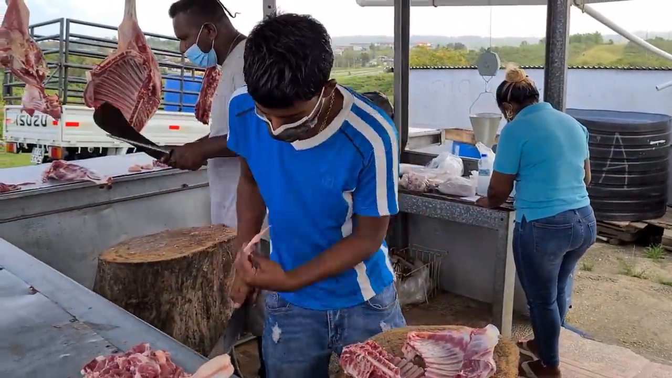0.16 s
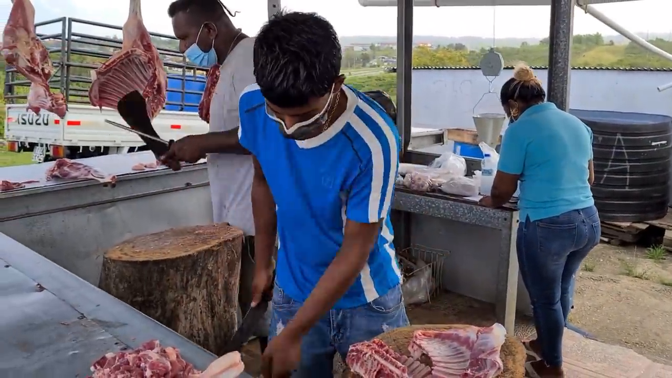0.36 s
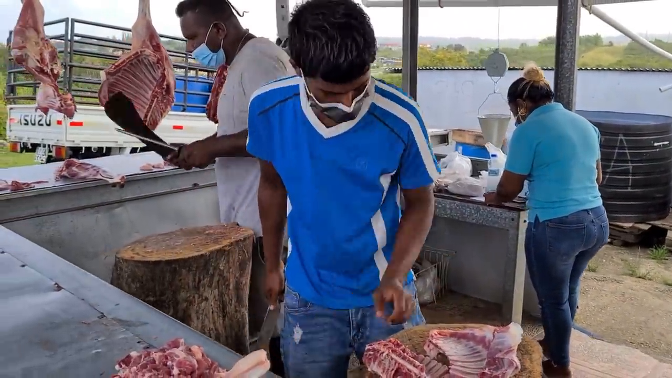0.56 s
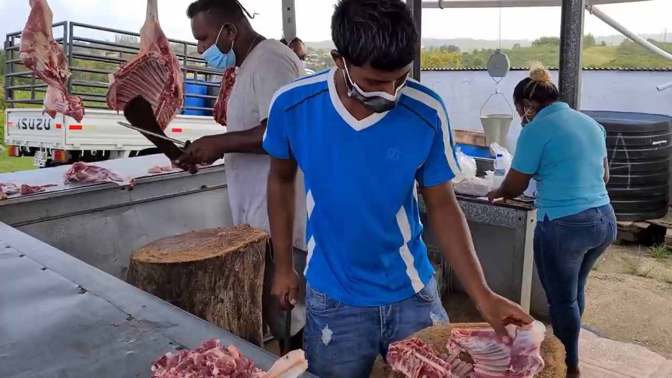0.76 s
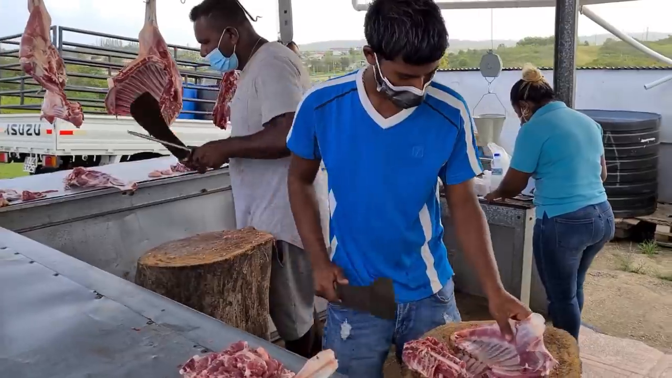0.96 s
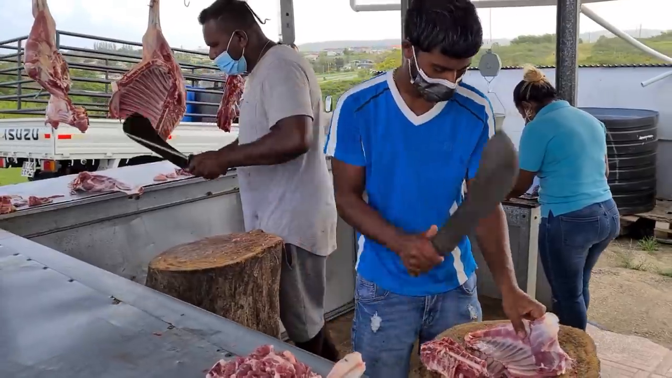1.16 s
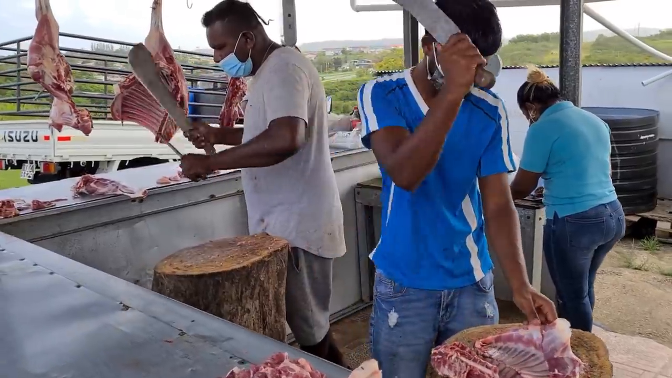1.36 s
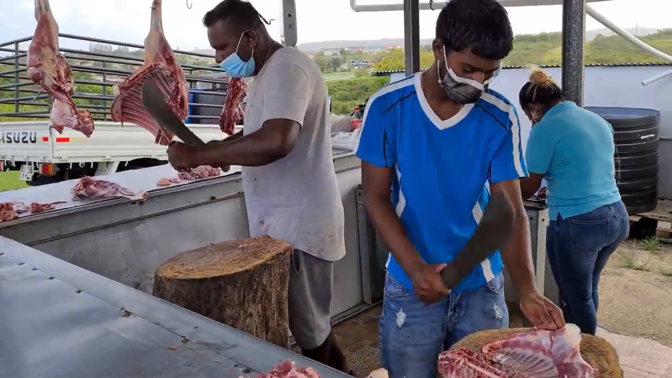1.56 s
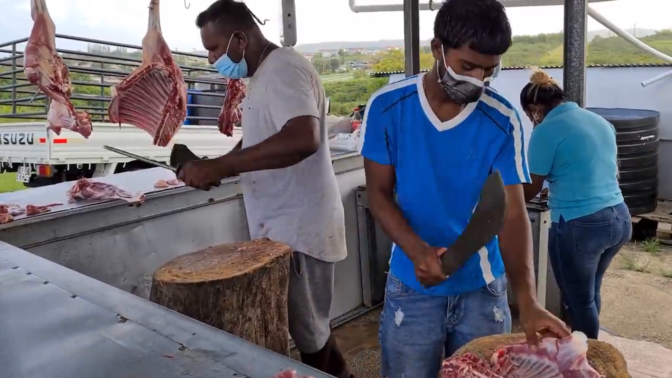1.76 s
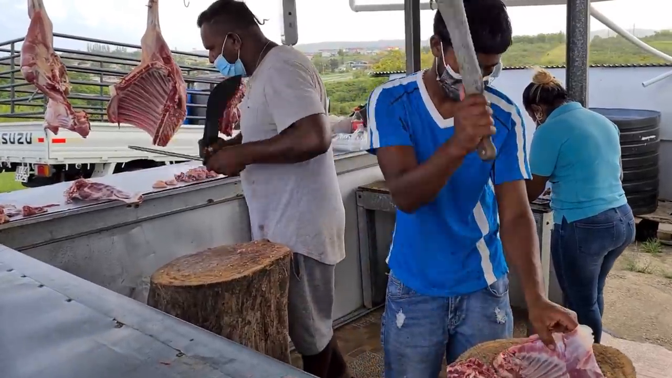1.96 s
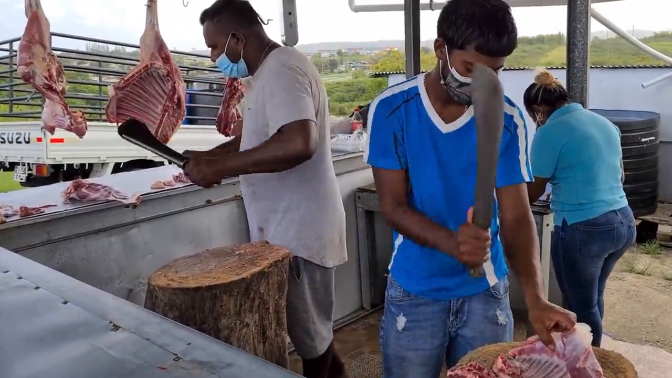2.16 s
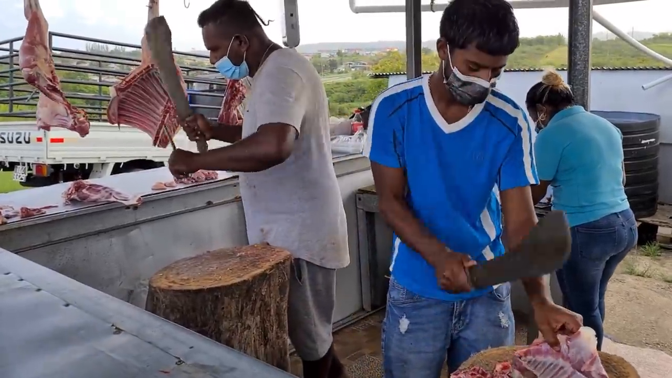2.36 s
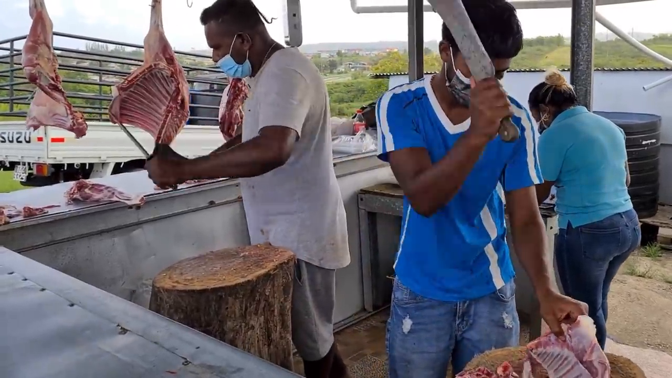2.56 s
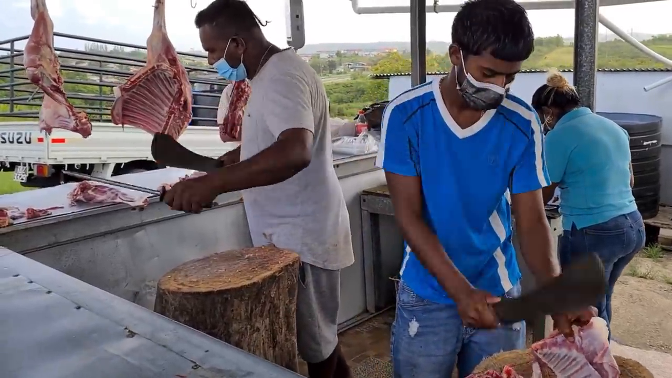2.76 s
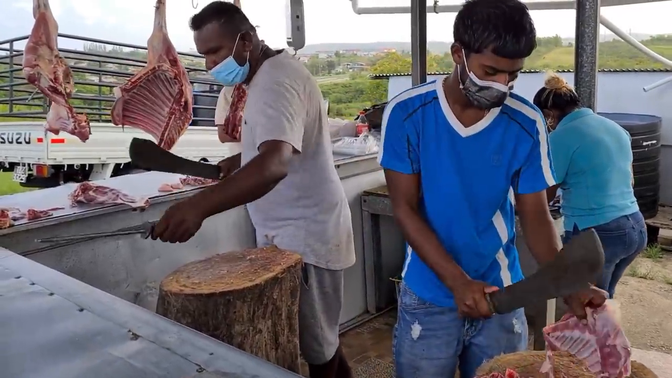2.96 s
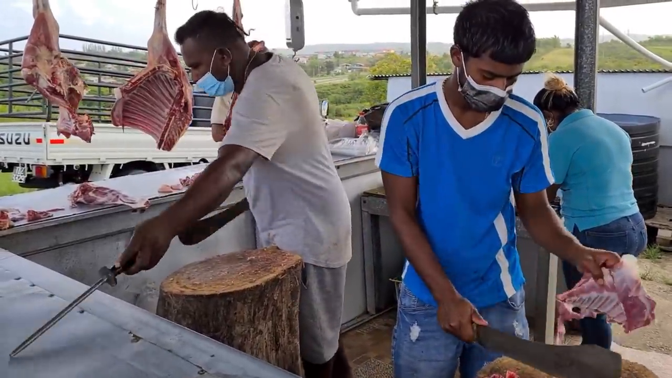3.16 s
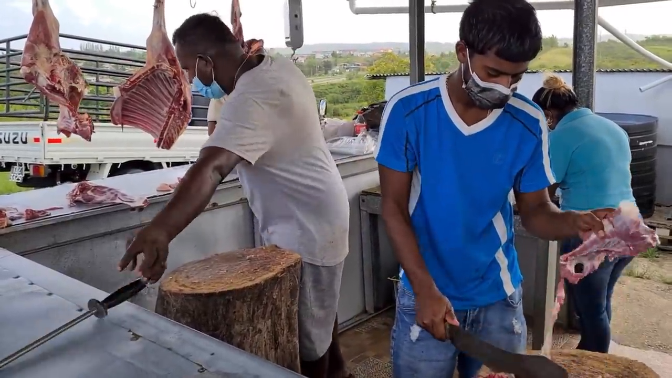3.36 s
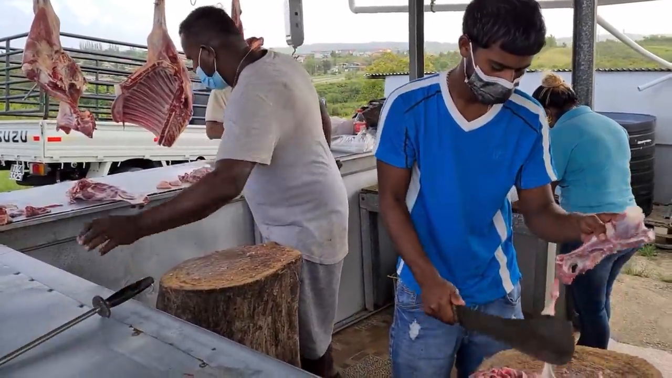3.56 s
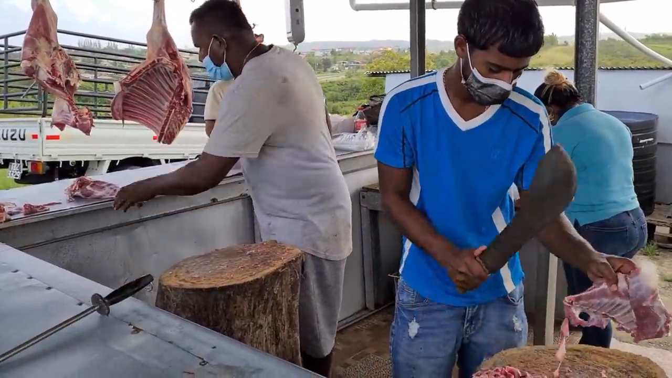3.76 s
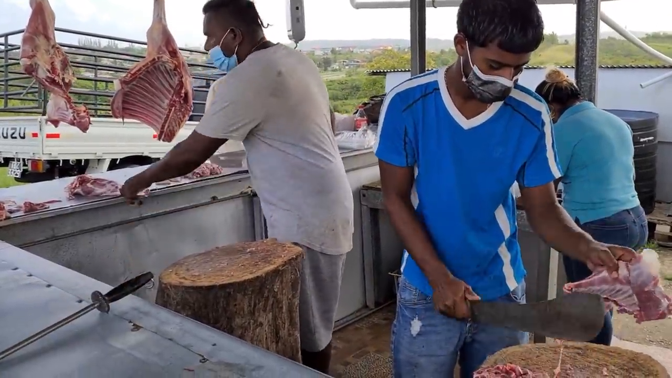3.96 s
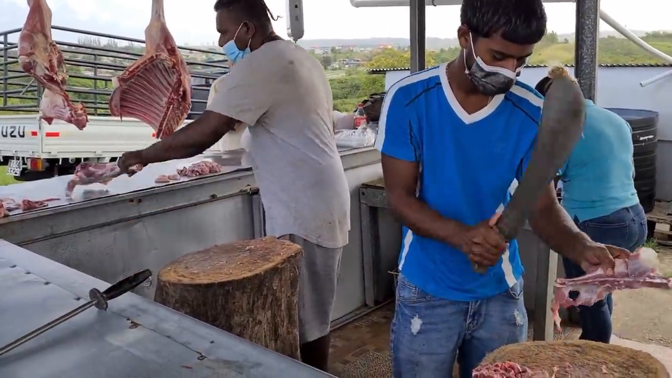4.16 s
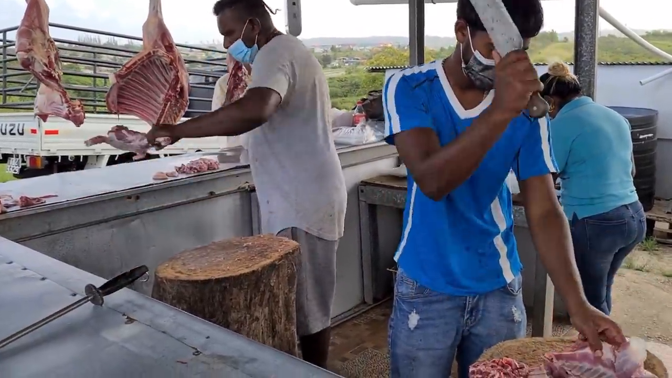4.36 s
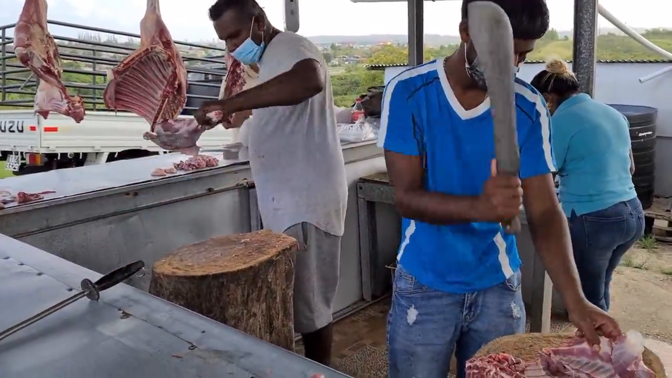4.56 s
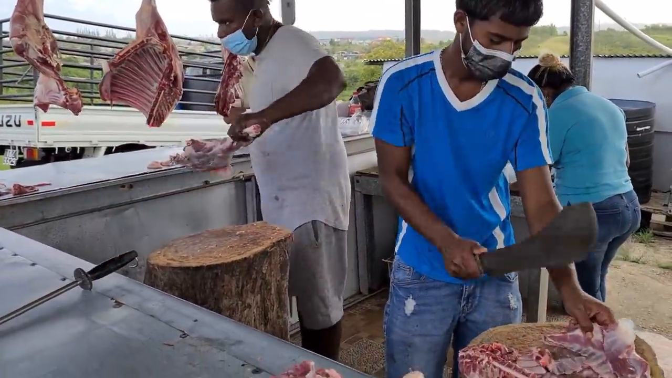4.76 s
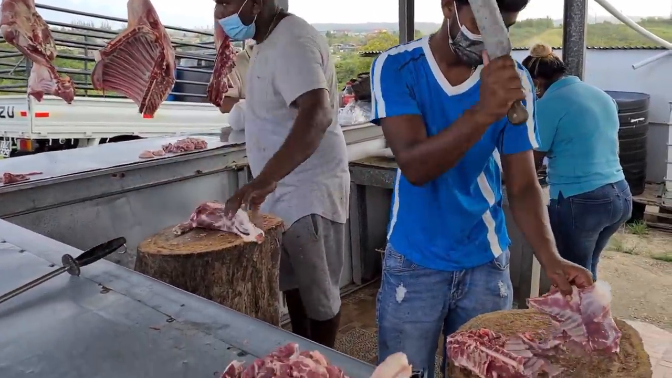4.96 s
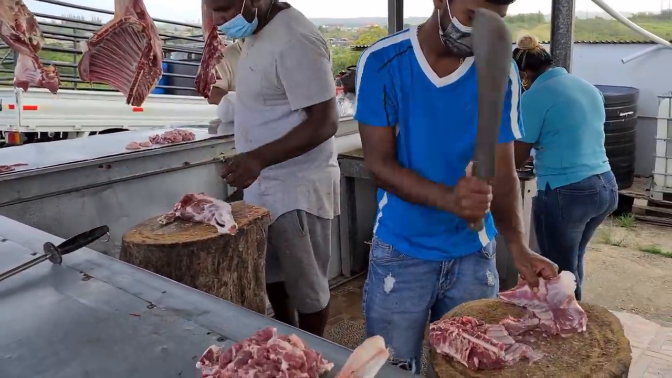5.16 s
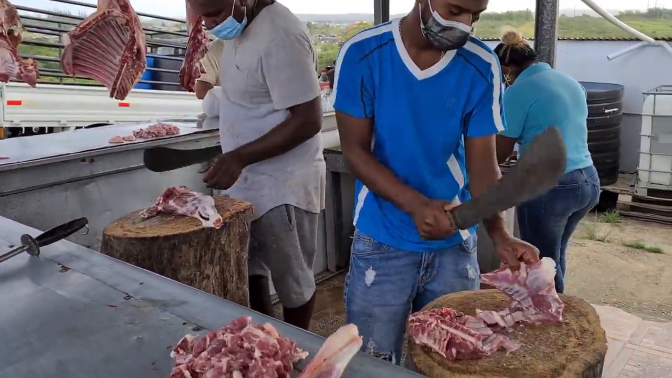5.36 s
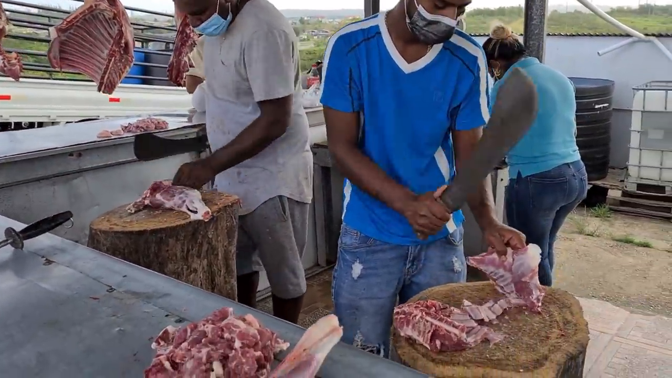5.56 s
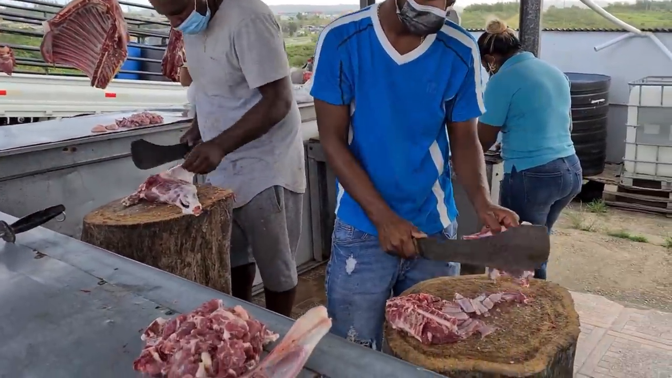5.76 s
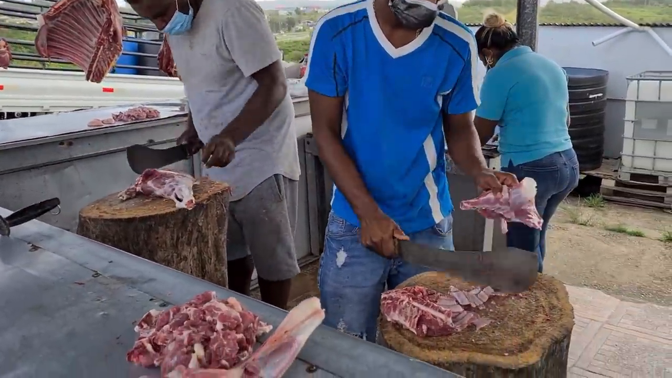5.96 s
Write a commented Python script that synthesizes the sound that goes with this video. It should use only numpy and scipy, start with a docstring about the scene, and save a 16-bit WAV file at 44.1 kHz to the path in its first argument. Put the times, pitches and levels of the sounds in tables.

```python
"""An open-air meat stall under a low roof, with a fading engine hum and the noise of the road behind it.
From the start a butcher whets a blade on a honing steel: friction bands, wavering modes and clinks.
Soon a second one chops meat and bone on a stump: filtered noise bursts and short decaying modes.
Then the steel drops on a sheet-metal counter: booming modes, a dense noise tail and a rattle.
Near the end, amid the last chops, meat is slapped on another block: a blow plus one sharp resonance."""
import sys
import numpy as np
from scipy import signal
from scipy.fft import rfft, irfft, next_fast_len
from scipy.io import wavfile
from scipy.ndimage import uniform_filter1d, map_coordinates

SR = 44100
rng = np.random.default_rng(int(sys.argv[2]) if len(sys.argv) > 2 else 0)


def generate_wav(signal):
    """Clip the signal to [-1, 1] and save it as 16-bit WAV at the path in sys.argv[1]."""
    frames = np.transpose(np.atleast_2d(signal))
    scaled = np.clip(frames, -1, 1) * 32767
    pcm = np.round(scaled).astype(np.int16)
    wavfile.write(sys.argv[1], SR, pcm)


N = 265482
TIME = np.arange(N) / SR  # the whole scene, seconds
SHORT = np.arange(SR // 2) / SR  # one event, seconds


def amp(db):
    """Level law: decibels to amplitude gain."""
    return 10 ** (np.asarray(db) / 20)


def unit(x):
    """Normalization: scale to rms 1."""
    return x / np.sqrt(np.mean(x ** 2) + 1e-20)


def fade(t, t60):
    """Exponential decay: the amplitude falls to a thousandth after t60."""
    return np.exp(-np.log(1000) * t / np.maximum(t60, 1e-4))


def along(points, hz):
    """Logarithmic frequency scale: (Hz, value) points interpolated at hz."""
    f, v = np.transpose(points)
    return np.interp(np.log(hz + 1), np.log(f + 1), v)


def over_time(points):
    """Linear envelope: (seconds, value) points interpolated at every sample."""
    s, v = np.transpose(points)
    return np.interp(TIME, s, v)


def wobble(rate, t):
    """Band-limited fluctuation: a smooth random curve with rate knots a second."""
    return map_coordinates(rng.standard_normal(1024), [t * rate], order=2, mode="wrap")


def filtered(x, response):
    """Linear filtering: the spectrum of x is multiplied by a response of frequency."""
    n = x.shape[-1]
    m = next_fast_len(n + 8192)
    return irfft(rfft(x, m) * response(np.fft.rfftfreq(m, 1 / SR)), m)[..., :n]


def add(track, s, sound):
    """Superposition: mix a stereo sound into the track at s seconds."""
    start = max(round(s * SR), 0)
    track[:, start:start + sound.shape[-1]] += sound[:, :N - start]


# Left-right correlation of diffuse sound. Each row: frequency in Hz, correlation from -1 to 1.
LIKENESS = [(30, 0.55), (70, 0.54), (140, 0.95), (290, 0.82), (640, 0.57), (1400, -0.26), (3000, 0.0058),
            (7000, 0.079)]


def diffuse(spectrum, size):
    """Diffuse field: stereo noise of rms 1, largely alike in the bass, nearly unrelated in the treble."""
    def mid_side(hz):
        turn = np.arccos(np.clip(along(LIKENESS, hz), -1, 1)) / 2
        return amp(along(spectrum, hz)) * [np.cos(turn), np.sin(turn)]

    mid, side = filtered(rng.standard_normal((2, size)), mid_side)
    return unit(np.array([mid + side, mid - side]))


def dying(spectrum, t60s):
    """Frequency-dependent damping: diffuse noise in which each frequency dies at its own speed."""
    hz, t, z = signal.stft(diffuse(spectrum, len(SHORT)), SR, nperseg=256)
    decayed = z * fade(t, along(t60s, hz)[:, None])
    return signal.istft(decayed, SR, nperseg=256)[1][:, :len(SHORT)]


# Decay of the stall's echo. Each row: frequency in Hz, t60 in seconds.
ROOF_T60 = [(120, 0.34), (500, 0.29), (1500, 0.23), (4000, 0.23), (9000, 0.22), (15000, 0.18)]


def roof_tail(spectrum, swell_s):
    """Reverberation: counters and roof answer with a dense tail that swells and dies; energy 1 a channel."""
    tail = dying(spectrum, ROOF_T60) * (1 - np.exp(-np.square(SHORT / swell_s)))
    return unit(tail) / np.sqrt(len(SHORT))


def direct(x, lag_ms):
    """Arrival-time difference: a positive lag reaches the right channel first, a negative one the left."""
    sides = np.array([[-1], [1]])
    return filtered(x, lambda hz: np.exp(1j * np.pi * hz * lag_ms / 1000 * sides))


def in_stall(x, room_db, lag_ms, swell_s):
    """Direct and reverberant sound: the echo is the source convolved with the stall's tail."""
    x = np.pad(x, (0, len(SHORT) - len(x)))
    flat = [(1, 0)]
    echo = signal.fftconvolve(x[None], roof_tail(flat, swell_s), axes=1)[:, :len(x)]
    return direct(x, lag_ms) + amp(room_db) * echo


def sing(hz, width, t):
    """Friction-driven resonance: a randomly modulated sine with a pitch for each sample."""
    return wobble(2 * width, t) * np.sin(2 * np.pi * np.cumsum(hz) / SR)


# Spectrum of the low rumble. Each row: frequency in Hz, relative spectral density in dB.
RUMBLE_SPECTRUM = [(13, -44), (22, -30.5), (48, -4.5), (65, -1), (76, -4.5), (103, -10.5), (146, -13.5),
                   (249, -16), (300, -20), (390, -28.5), (660, -120)]
# Spectrum of the distant rush of tyres. Each row: frequency in Hz, relative spectral density in dB.
RUSH_SPECTRUM = [(130, -35.5), (220, 0), (249, -13), (351, -4), (580, -7.5), (645, -7), (772, -5),
                 (1170, -2), (1450, -6), (1670, -5), (2430, -18.5), (3240, -23), (4560, -35.5),
                 (13400, -43), (16000, -56.5)]
# Course of the rumble. Each row: time in seconds, level in dB before rumble_db is added.
RUMBLE_COURSE = [(0.0, -38), (0.28, -37), (2.11, -40), (3.45, -36.5), (3.82, -30), (4.56, -38.5),
                 (6.02, -39)]
# Course of the rush. Each row: time in seconds, level in dB before rush_db is added.
RUSH_COURSE = [(0.0, -29), (0.35, -34), (0.75, -32.5), (2.3, -37), (2.62, -39.5), (3.2, -39), (3.45, -31),
               (3.86, -31), (4.06, -38), (4.51, -34), (5.62, -43.5), (6.02, -44)]


def road(rush_db=4.5, rumble_db=8.0):
    """Broadband noise: a lumpy low rumble and a distant rush, each following its own level course."""
    rumble_level = over_time(RUMBLE_COURSE) + rumble_db + 1.5 * wobble(12, TIME)
    rush_level = over_time(RUSH_COURSE) + rush_db + 0.3 * wobble(13, TIME)
    rumble = amp(rumble_level) * diffuse(RUMBLE_SPECTRUM, N)
    rush = amp(rush_level) * diffuse(RUSH_SPECTRUM, N)
    return rumble + rush


FIRING_HZ, FIRING_WANDER_HZ = 83.6, .3
# a 0 dB order starts near rms HUM_DB; at full share it loses HUM_FADE_DB by HUM_FADE_S, then fades more slowly
HUM_DB, HUM_FADE_DB, HUM_FADE_S = -19.5, 8.5, 0.65
# Exhaust orders. Each row: multiple of the firing rate, relative level in dB, share of the fade it follows.
EXHAUST_ORDERS = [(1, 1, 0.91), (1.5, -4, 0.97), (2, -18.5, 1), (3, -13, 0.75), (4, -20.5, 1)]


def engine():
    """Harmonic synthesis: the low orders of an idling exhaust, each fading by its own share."""
    phase = 2 * np.pi * np.cumsum(FIRING_HZ + FIRING_WANDER_HZ * wobble(2, TIME)) / SR
    fade_db = -HUM_FADE_DB * np.log2(1 + TIME / HUM_FADE_S)
    hum = 0
    for multiple, db, share in EXHAUST_ORDERS:
        level = amp(db + share * fade_db + wobble(4.2, TIME))
        hum = hum + level * np.sin(multiple * phase + 2 * np.pi * rng.random())
    return np.sqrt(2) * amp(HUM_DB) * hum


# Modes of the stump and cleaver together. Each row: mean frequency in Hz, relative level in dB, t60 in seconds.
STUMP_MODES = [(136.2, 2.5, 0.098), (187.5, -0.5, 0.069), (295, 0.5, 0.058), (390, 6.5, 0.023),
               (557, -1.5, 0.036), (795, 6, 0.028), (1050, -2, 0.033), (1312, 3.5, 0.024),
               (1485, 2.5, 0.03), (1710, -2, 0.026), (1920, -5, 0.003)]


def stump(force, split_hz, late_s, thwack_db=2, thwack_t60=.022):
    """Modal excitation: the force weights each mode; those below split_hz start late_s later."""
    ring = 0
    for hz, db, t60 in STUMP_MODES:
        t = np.maximum(SHORT - late_s * (hz < split_hz), 0)
        pitch = hz * rng.normal(1, .03)
        level = rng.choice([-1, 1]) * amp(db - 3.5 + along(force, hz))
        ring = ring + level * np.sin(2 * np.pi * pitch * t) * fade(t, t60)
    # meat and end grain add a broad, dull thwack
    dull = [(70, -24.0), (150, 6.0), (1800, 0.5), (2600, -30.0), (6000, -62)]
    noise = rng.standard_normal(len(SHORT))
    thwack = filtered(noise, lambda hz: amp(along(force, hz) + along(dull, hz) + 11.5))
    return ring + amp(thwack_db) * thwack * fade(SHORT, thwack_t60) * (1 - np.exp(-SHORT / 0.00061))


# Spectrum of splitting bone, also used for rattling steel.
# Each row: frequency in Hz, relative spectral density in dB.
CRACK_SPECTRUM = [(500, -26), (1500, 0.5), (2300, 0.5), (3300, -1), (4500, -9.5), (8000, -8),
                  (13000, -10.5), (16000, -19)]


def crunch(spiky_db):
    """Amplitude-modulated noise: a spiky, fluctuating noise with the spectrum of splitting bone."""
    spiky = rng.standard_normal(len(SHORT)) * amp(spiky_db * wobble(1500, SHORT))
    return unit(filtered(spiky, lambda hz: amp(along(CRACK_SPECTRUM, hz))))


def blow(s, force, crack_db, lead_s, late_s, room_db, swell_s, lag_ms,
         crack_t60=0.016, spiky_db=2, lead_db=-7, snap_db=3.5, spray_db=0.0):
    """Impact with a lead-in: a soft noise swells for lead_s, then at s the bone cracks and the wood rings."""
    track, t = np.zeros((2, N)), SHORT
    lead_in = amp(crack_db + lead_db) * crunch(spiky_db) * (t / lead_s) ** 2 * (t < lead_s)
    add(track, s - lead_s, in_stall(lead_in, room_db, lag_ms, swell_s))
    crack = amp(crack_db + snap_db) * crunch(spiky_db) * fade(t, crack_t60) * (1 - np.exp(-t / 0.00032))
    # the crack's energy comes back as an even, bright tail
    spray = amp(room_db + spray_db) * np.linalg.norm(crack) * roof_tail(CRACK_SPECTRUM, swell_s)
    add(track, s, direct(crack, lag_ms) + spray)
    add(track, s, in_stall(stump(force, split_hz=920, late_s=late_s), room_db, lag_ms, swell_s))
    return track


# The counter's crowded modes. Each row: frequency in Hz, relative spectral density in dB.
PANEL_SPECTRUM = [(35, -68), (60, -23), (125, -2), (215, -2), (303, -10), (357, -7), (394, -9), (547, -11),
                  (823, -15), (1070, -15), (1660, -9), (2550, -38), (3000, -29.5), (3900, -58.5),
                  (6600, -120)]
# Damping of the crowded modes. Each row: frequency in Hz, t60 in seconds.
PANEL_DECAY = [(70, 0.87), (150, 0.39), (500, 0.98), (1500, 0.31), (4000, 0.35)]
# The counter's strongest modes. Each row: frequency in Hz, mean relative level in dB, t60 in seconds.
SHEET_MODES = [(121.7, -1, 0.62), (172.3, -2.5, 0.16), (212, -5, 0.13), (257.7, 1.5, 0.26),
               (306, -5.5, 0.57), (385, -16, 0.88), (548, -5.5, 0.32), (622, -7.5, 0.31), (1095, -17, 0.41)]
# Knocks on the counter. Each row: start in seconds, relative boom level in dB, relative rattle level in dB.
KNOCKS = [(3.2248, -8, -18.5), (3.246, -16, -21.5), (3.29, -20.5, -41), (3.436, -14.5, -19),
          (3.475, -13, -29.5), (4.166, -50, -46), (4.411, -46, -36)]
KNOCK_RISE_S, RATTLE_T60 = 0.0014, 0.22
BUZZ_DB, BUZZ_T60 = -19.5, 1  # the steel buzzes on faintly after each rattle


def counter(sheet_db=-4, wash_db=-2.0):
    """Plate vibration: the steel lands and settles; strong and crowded modes boom while steel rattles."""
    track = np.zeros((2, N))
    settling = fade(SHORT, RATTLE_T60) + amp(BUZZ_DB) * fade(SHORT, BUZZ_T60)
    for s, boom_db, rattle_db in KNOCKS:
        modes = 0
        for hz, db, t60 in SHEET_MODES:
            level = amp(db + rng.normal(0, 2.5))
            modes = modes + level * np.sin(2 * np.pi * hz * SHORT) * fade(SHORT, t60)
        wash = dying(PANEL_SPECTRUM, PANEL_DECAY)
        boom = amp(boom_db) * (amp(wash_db) * wash + amp(sheet_db) * modes)
        flutter = amp(1.1 * wobble(250, SHORT))
        rattle = amp(rattle_db) * diffuse(CRACK_SPECTRUM, len(SHORT)) * settling * flutter
        add(track, s, (boom + rattle) * (1 - np.exp(-SHORT / KNOCK_RISE_S)))
    return track


SLAP_S, SLAP_CRACK_DB = 5.01, -11
SMACK_HZ, SMACK_WIDTH_HZ, SMACK_DB, SMACK_T60 = 2790, 890, -15.5, 0.035  # the sharp note of the slap
# Force spectrum of the slap. Each row: frequency in Hz, relative level in dB.
SLAP_SPECTRUM = [(260, -20.5), (480, -12), (950, -23.5), (1300, -19)]


def slap():
    """Damped impact: a cut of meat lands on the other block with a short, dry smack."""
    place = dict(room_db=-7.5, swell_s=.003, lag_ms=-.086)
    track = blow(SLAP_S, SLAP_SPECTRUM, SLAP_CRACK_DB, lead_s=.011, late_s=0.0061, **place)
    note = unit(sing(np.full(len(SHORT), SMACK_HZ), SMACK_WIDTH_HZ, SHORT))
    smack = amp(SMACK_DB) * note * fade(SHORT, SMACK_T60)
    add(track, SLAP_S, in_stall(smack, **place))
    return track


# a longer lead-in goes with more echo, a later swell of the echo and later low modes
CHOP_ROOM_DB, ROOM_DB_PER_LEAD_S = -1.3, 230
CHOP_SWELL_S, SWELL_PER_LEAD, LATE_PER_LEAD = 0.005, 0.48, 0.126
CHOP_LAG_MS = .21  # the near stump is off to one side
# Force spectrum of a chop. Each row: multiple of the knock centre, level in dB relative to the knock.
KNOCK_FORCE = [(0.381, -17), (.62, -12.5), (.93, 0.5), (1.45, -0.5), (2.6, 0)]
# Cleaver blows on the near stump. Each row: time of the crack in seconds, relative knock level in dB,
# knock centre in Hz, relative thud level in dB, relative bone crack level in dB, lead-in time in seconds.
CLEAVER_BLOWS = [(1.6503, -6, 1310, -14.5, -8, 0.0046), (2.2832, -9.5, 720, -27, -9.5, .011),
                 (2.8450, -7, 1200, -14, -6.5, .004), (3.9697, -8, 1470, -19, -12.5, 0.0066),
                 (4.7319, -10, 1380, -22, -11.5, .016), (5.3176, -15.5, 1310, -20, -11.5, .022),
                 (5.7281, -7, 1470, -15.5, -15.5, 0.0043)]


def chopping(thud_hz=260):
    """Impact spectrum: the cleaver chops through meat and bone; each blow has its own knock, thud and crack."""
    track = np.zeros((2, N))
    for s, knock_db, knock_hz, thud_db, crack_db, lead_s in CLEAVER_BLOWS:
        force = [(thud_hz, thud_db)] + [(k * knock_hz, knock_db + db) for k, db in KNOCK_FORCE]
        room_db = CHOP_ROOM_DB + ROOM_DB_PER_LEAD_S * lead_s
        swell_s = CHOP_SWELL_S + SWELL_PER_LEAD * lead_s
        late_s = LATE_PER_LEAD * lead_s
        track += blow(s, force, crack_db, lead_s, late_s, room_db, swell_s, CHOP_LAG_MS)
    return track


def shimmer(x, depth_db):
    """Moving contact: the travelling contact point favours one narrow band after another."""
    z = signal.stft(x, nperseg=512)[2]
    field = rng.standard_normal(z.shape)
    for axis in (0, 1):
        field = uniform_filter1d(field, size=3, axis=axis)
    return signal.istft(z * amp(depth_db * unit(field)), nperseg=512)[1][:len(x)]


# Modes of the whetted blade. Each row: mean frequency in Hz, nominal width in Hz, relative level in dB.
BLADE_MODES = [(1735, 108.8, 2.5), (2740, 27, -4.5), (3360, 32, -6.5), (4390, 90, -2), (4770, 23, -12),
               (4830, 130, -38), (6040, 66, -4), (6700, 43, -8), (9070, 91, -6), (8600, 320, -7),
               (9360, 130, -23), (9800, 230, -5), (10700, 110, -17.5), (11350, 100, -10), (11330, 93, -7),
               (12320, 120, -7.5)]


def clink(t60=0.11, sag=0.092, sag_s=0.037, dull_db=-6):
    """Impact on a bar: it rings mostly the lowest mode; the pitch sinks as the blade slides off."""
    t = SHORT[:len(SHORT) // 2]
    clock = t + sag * sag_s * (1 - np.exp(-t / sag_s))  # runs fast at first
    lowest = BLADE_MODES[0][0]
    ring = 0
    for hz, _, db in BLADE_MODES:
        level = amp(db + dull_db * np.log2(hz / lowest))
        ring = ring + level * np.sin(2 * np.pi * hz * rng.normal(1, 0.015) * clock)
    return ring * fade(t, t60)


BLADE_BEND, BLADE_SCATTER = .07, .015  # share of the slide that bends the modes; how far they waver
FIRM_DB, TILT_PER_DB = -15, 0.28  # below FIRM_DB strokes are duller: dB per octave for each dB of level
# Spectrum of the scraping edge. Each row: frequency in Hz, relative spectral density in dB.
SCRAPE_SPECTRUM = [(820, -30), (1400, -8), (1660, -2), (2430, -6), (2770, -2.5), (7220, -6.5), (8950, -2.5),
                   (10800, -19), (11900, 0), (14900, -13.5), (16000, -27.5)]


def stroke(db, tilt_db, rise, length, from_hz, octaves_per_s, ring_db=-4, slide_db=-9.5,
           zing_hz=10200, zing_db=-6, grit_db=3, release=0.049, swell_db=22, linger_db=-25, linger_t60=0.59):
    """Sliding friction: noise and wavering modes rasp; two resonances slide with the blade's free length."""
    t = SHORT
    rasp = unit(filtered(rng.standard_normal(len(t)), lambda hz: amp(along(SCRAPE_SPECTRUM, hz))))
    octaves = octaves_per_s * np.minimum(t, length)
    centred = octaves - octaves[-1] / 2
    bend = 2 ** (BLADE_BEND * centred)
    ring = 0
    for hz, width, level in BLADE_MODES:
        pitch = hz * bend * (1 + BLADE_SCATTER * wobble(20, t))
        ring = ring + amp(level) * sing(pitch, width, t)
    slide = unit(sing(from_hz * 2 ** octaves, 220, t))
    zing = unit(sing(zing_hz * 2 ** (.7 * centred), 900, t))
    mixed = rasp + amp(ring_db) * unit(ring) + amp(slide_db) * slide + amp(zing_db) * zing
    metal = unit(shimmer(mixed, depth_db=3))
    swell = amp(swell_db * np.minimum(t / rise - 1, 0))
    after = np.maximum(t - length, 0)
    gritty = fade(after, release) * amp(grit_db * wobble(500, t))
    sound = metal * swell * (gritty + amp(linger_db) * fade(after, linger_t60))
    bright_db = tilt_db + TILT_PER_DB * min(db - FIRM_DB, 0)  # per octave around 7 kHz, constant below 1 kHz
    return amp(db) * filtered(sound, lambda hz: amp(bright_db * np.log2(np.maximum(hz, 1000) / 7000)))


SLIDE_OCTAVES_PER_S = 8  # the resonance sinks on the way down and climbs on the way up
DOWN_RISE_S, UP_RISE_SHARE = 0.0011, .56  # a downstroke bites at once; an upstroke swells over this share
DOWN_TILT_DB, UP_TILT_DB = 1.25, 2.53  # brightness of a firm stroke, dB per octave
# The blade meets the steel and slides down it. Each row: start in seconds, relative clink level in dB,
# relative rasp level in dB, length in seconds, sliding resonance at the start in Hz.
DOWN = [(0.2413, -19.5, -15, 0.042, 3083), (0.6287, -25, -15, 0.039, 3190), (1.0187, -20, -15, 0.039, 2990),
        (1.5700, -11.5, -18.5, .016, 3010), (2.1187, -14, -14.5, .013, 2450),
        (2.5198, -15.5, -26.5, .012, 1970)]
# The blade is drawn back up. Each row: start in seconds, relative rasp level in dB, length in seconds,
# sliding resonance at the start in Hz.
UP = [(0.0, -10.5, .05, 2200), (0.37, -15, 0.081, 2113), (0.761, -12.5, .069, 1992),
      (1.144, -13.5, 0.082, 2214), (1.579, -17.5, 0.06, 2190), (2.135, -14.5, .095, 1603),
      (2.528, -22.5, 0.067, 1795)]


def whetting(stroke_db=-1, clink_db=0.0):
    """Impact and friction: strokes go down and up the honing steel; each downstroke begins with a clink."""
    track = np.zeros((2, N))
    place = dict(lag_ms=-.13, swell_s=.002)
    for s, hit_db, db, length, hz in DOWN:
        hit = amp(hit_db + clink_db) * clink()
        add(track, s, in_stall(hit, room_db=-2, **place))
        rasp = stroke(db, DOWN_TILT_DB, DOWN_RISE_S, length, hz, -SLIDE_OCTAVES_PER_S)
        add(track, s, in_stall(amp(stroke_db) * rasp, room_db=2.5, **place))
    for s, db, length, hz in UP:
        rasp = stroke(db, UP_TILT_DB, UP_RISE_SHARE * length, length, hz, SLIDE_OCTAVES_PER_S)
        add(track, s, in_stall(amp(stroke_db) * rasp, room_db=1.5, **place))
    return track


def scene():
    """Superposition: everything heard at the stall is summed."""
    return road() + engine() + counter() + slap() + chopping() + whetting()


def record(dry, top_hz=15600):
    """Saturation and band limiting: the highest peaks are rounded off, then a steep low-pass acts at top_hz."""
    rounded = dry / (1 + np.abs(dry) ** 6) ** (1 / 6)
    return filtered(rounded, lambda hz: 1 / (1 + (hz / top_hz) ** 160))


dry = scene()
out = record(dry)
generate_wav(out)
```